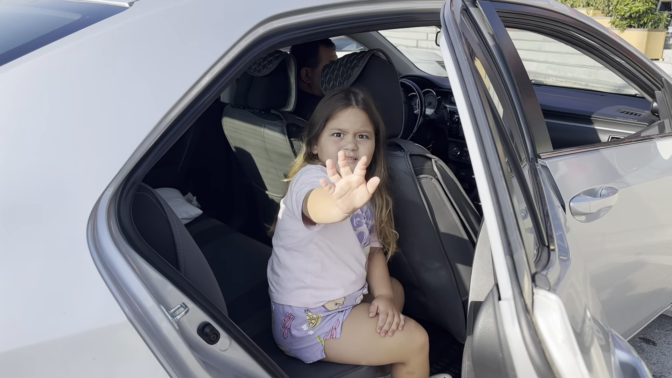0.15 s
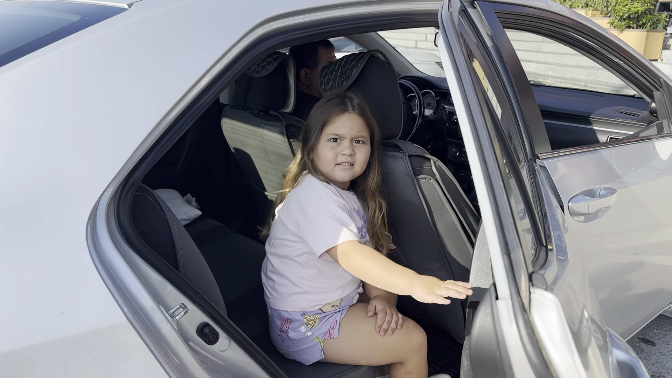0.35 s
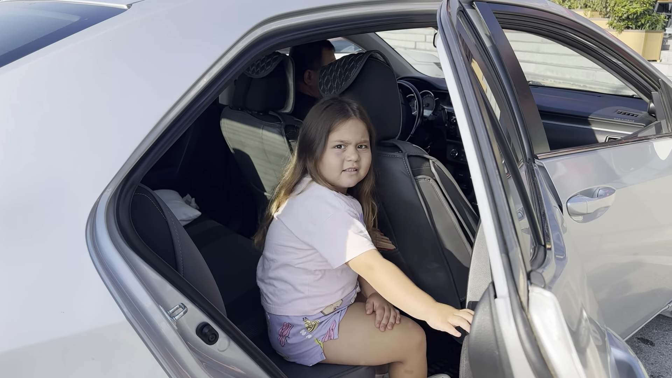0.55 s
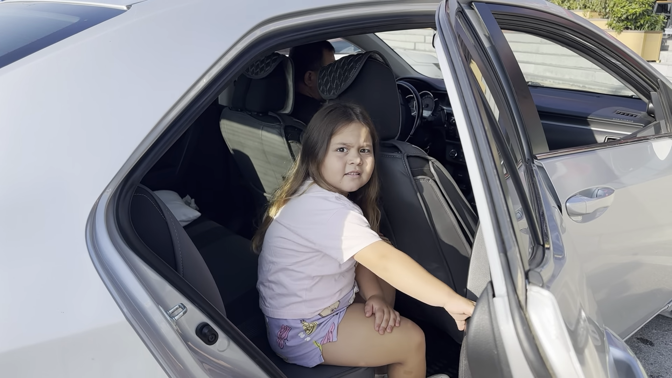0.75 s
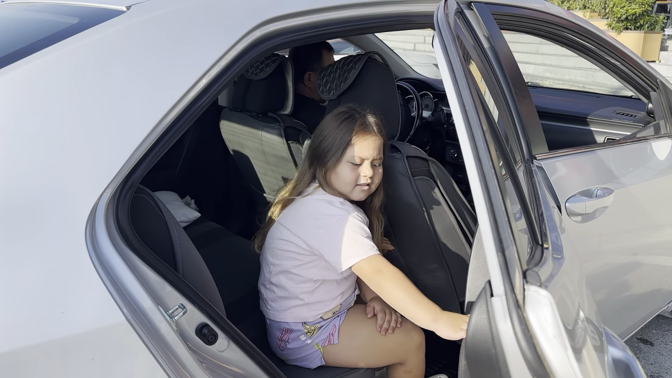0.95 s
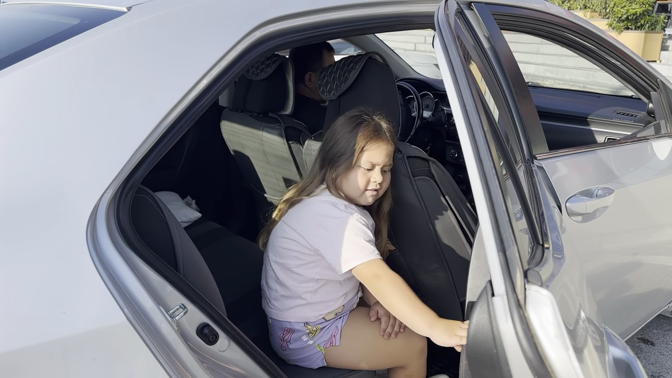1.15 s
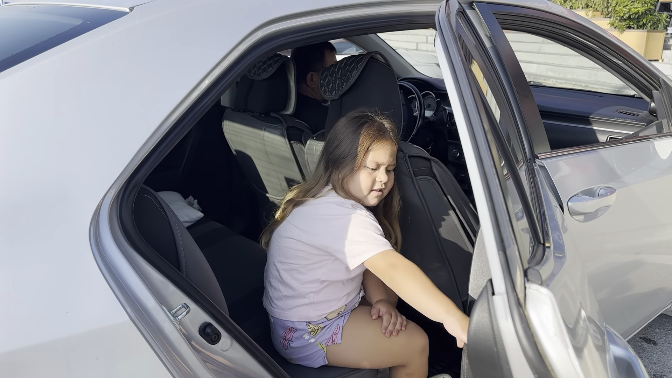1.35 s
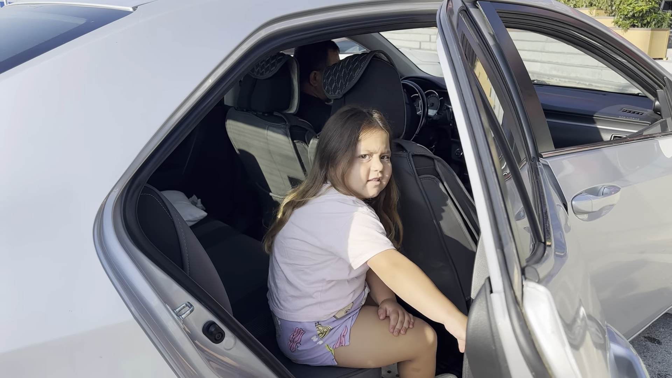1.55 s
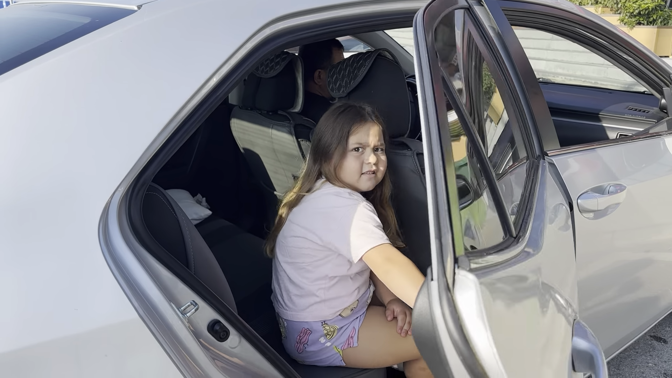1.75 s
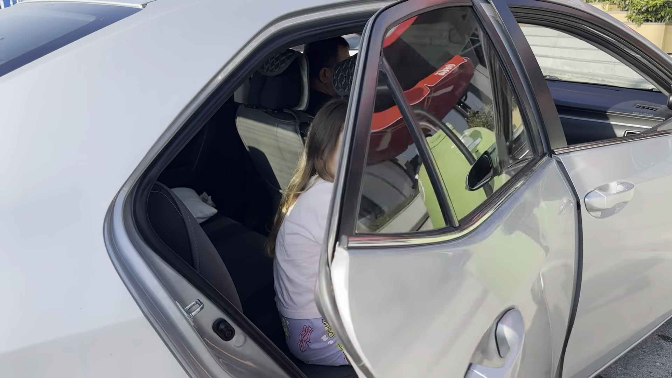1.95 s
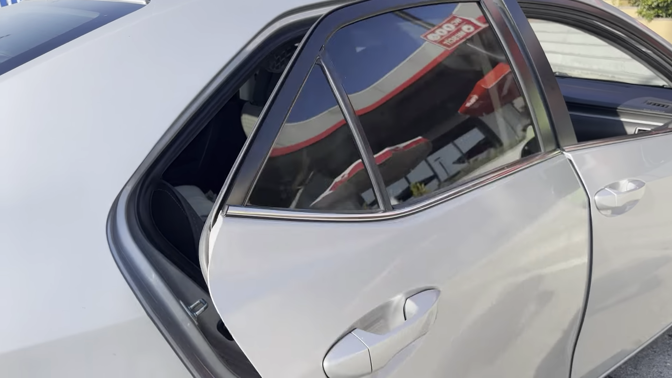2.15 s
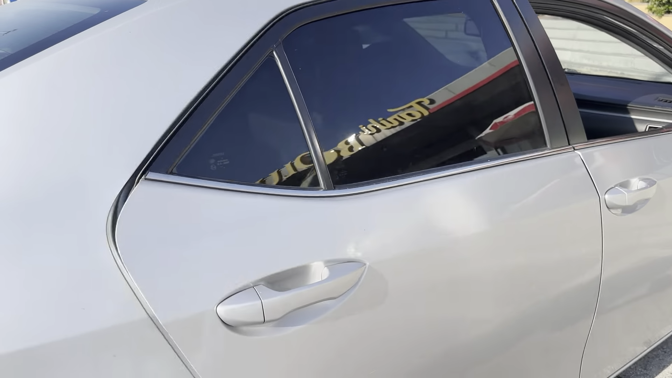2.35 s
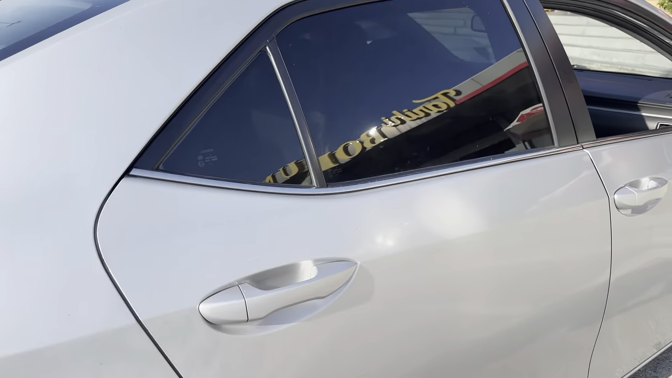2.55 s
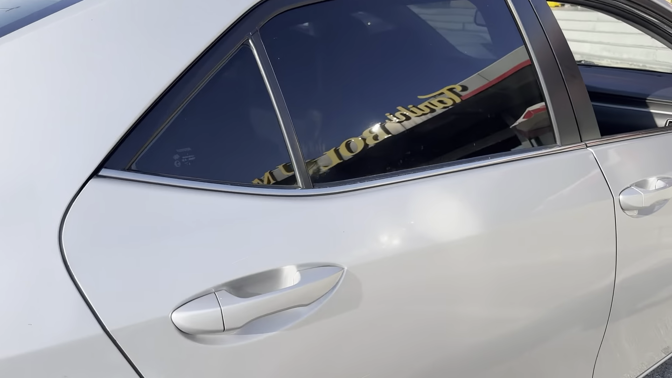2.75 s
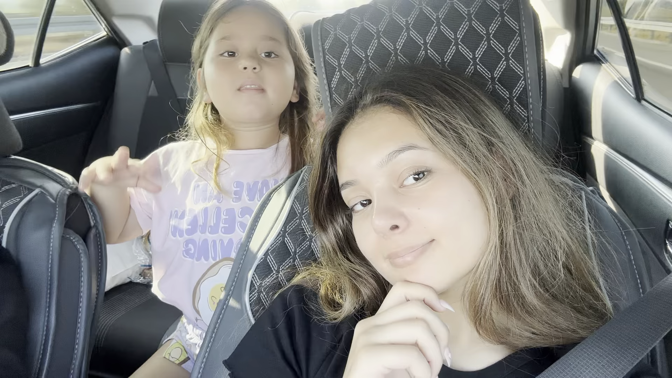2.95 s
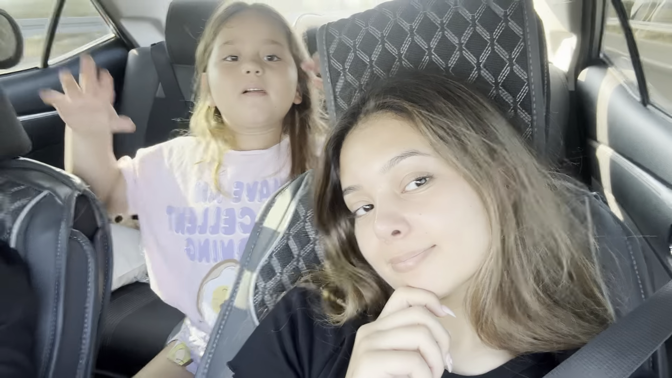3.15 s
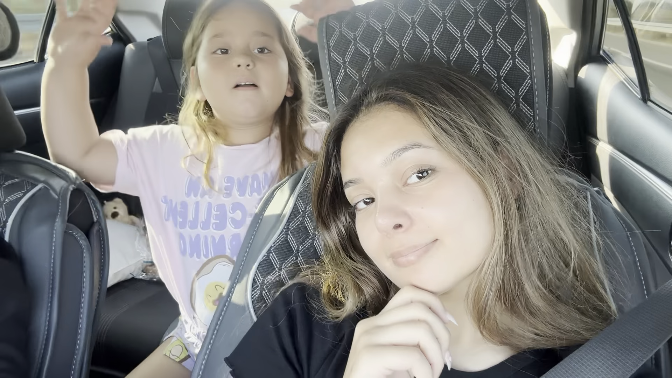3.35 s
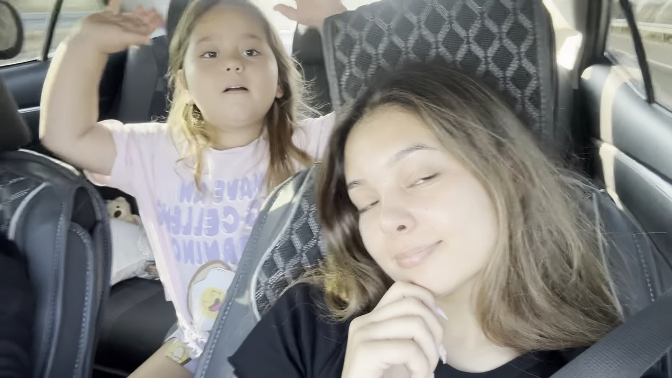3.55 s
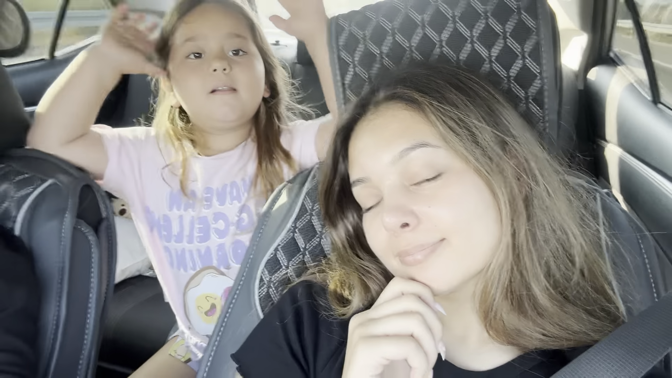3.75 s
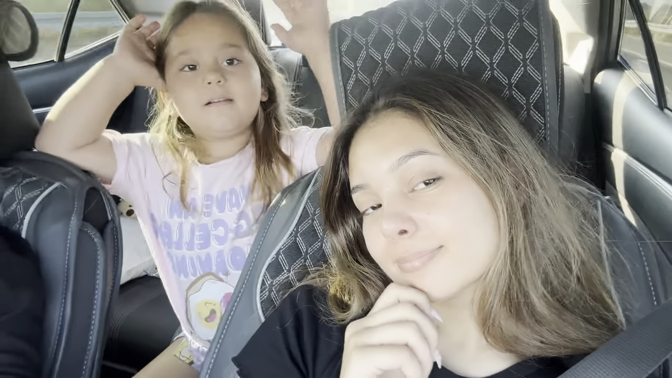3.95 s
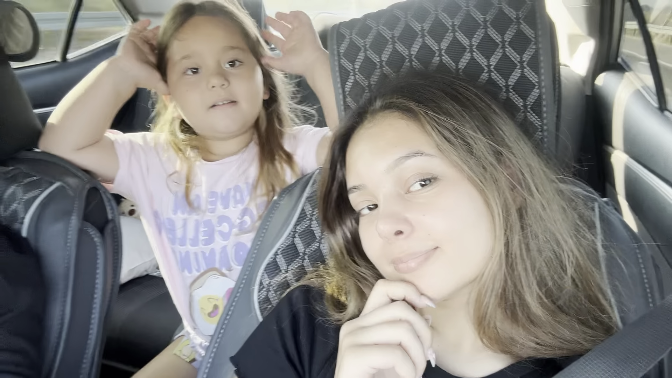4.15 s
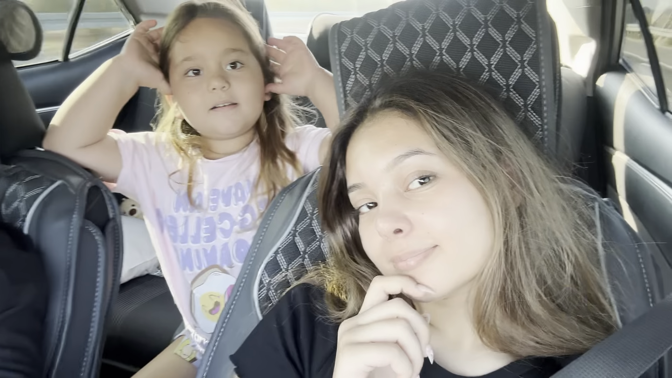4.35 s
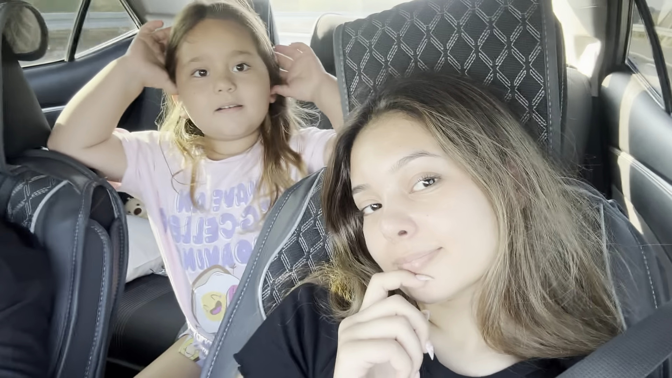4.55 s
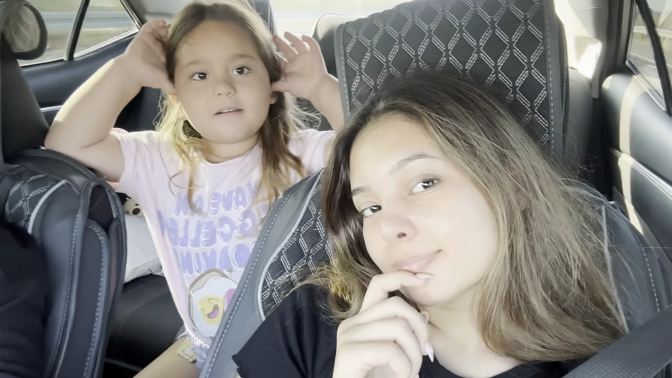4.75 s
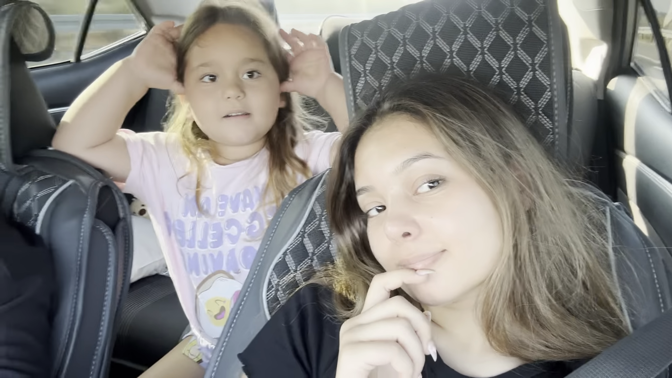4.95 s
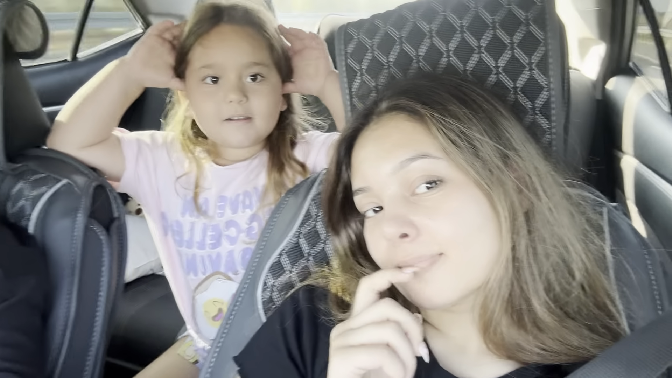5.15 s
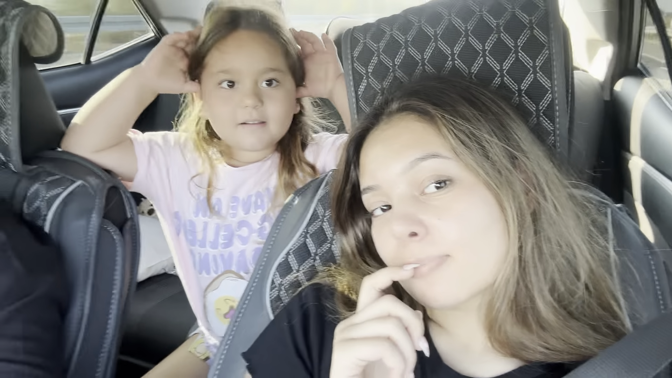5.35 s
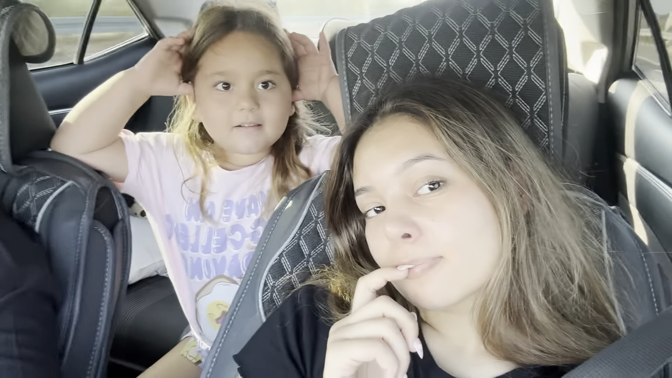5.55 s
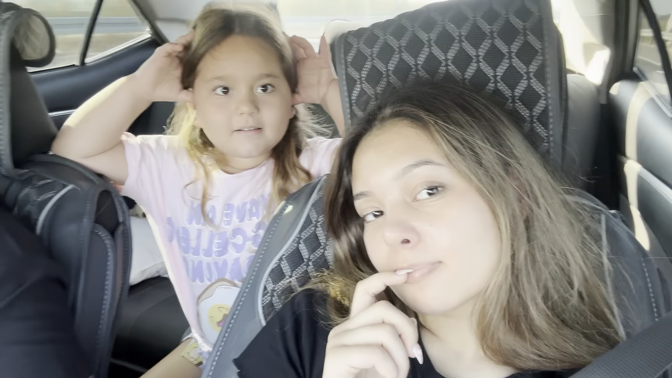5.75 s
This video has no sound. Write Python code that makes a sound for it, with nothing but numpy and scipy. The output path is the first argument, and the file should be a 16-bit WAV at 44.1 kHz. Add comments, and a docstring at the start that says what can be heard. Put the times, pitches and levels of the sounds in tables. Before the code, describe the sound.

The sound opens outdoors beside a parked car, with a faint low rumble of distant traffic and breeze. At about 1 second there is a tiny tick and a light brush, and at about 1.5 seconds a small metallic click as the rear door starts to swing. At about 2.4 seconds the door slams shut close by: one loud, solid thud with a sharp latch snap, a brief boom from the body and a short echo, gone within half a second.

At about 3 seconds the sound cuts abruptly to the inside of the car at cruising speed, starting with a dull bump. A steady low engine drone blends with the rumble and soft roar of tyres, clearly louder than the street was. Another soft road bump comes just after 4 seconds, and the driving noise carries on evenly until the end, near 6 seconds.

```python
"""Car door slam, then cruise.

In a quiet street a parked car's rear door rolls off its stay and is slammed: seal and latch strike,
the panels ring, the cabin booms, nearby walls echo. Then, abruptly, the inside of the car at a cruise:
engine and wheel orders drone, tyres rumble and roar on the road, faint wind hisses at the windows."""
import sys
import numpy as np
from scipy import signal
from scipy.fft import irfft
from scipy.io import wavfile
from scipy.ndimage import uniform_filter1d, minimum_filter1d

SR = 44100
rng = np.random.default_rng(int(sys.argv[2]) if len(sys.argv) > 2 else 0)


def to_wav(s):
    """Save 16-bit WAV."""
    ch = np.atleast_2d(s).T  # columns
    pcm = np.round(np.clip(ch, -1, 1) * 32767)  # PCM
    wavfile.write(sys.argv[1], SR, pcm.astype(np.int16))


N = 259647
TIME_S = np.arange(N) / SR
FREQ_HZ = np.maximum(np.arange(N // 2 + 1) * SR / N, 1)
CABIN_START_S = 3.036
CABIN_LAG_S = 0.00036   # left behind right

# street background spectrum: freq_hz, density_db
STREET_SPECTRUM = [(18, -50), (30, -23), (55, -2.5), (95, 0.5), (170, -6.5), (290, -14), (450, -18.5),
                   (620, -19.5), (880, -18.5), (1900, -28), (2900, -32.5), (4400, -33.5), (6000, -36),
                   (7800, -35), (9700, -36), (11300, -46.5), (12800, -59), (14600, -43), (15800, -39)]
# street left-right likeness: freq_hz, correlation
STREET_CORRELATION = [(60, 1), (200, 0.72), (400, 0.67), (900, -0.19), (2400, 0.3), (4400, 0.58),
                      (7600, 0.42), (8900, -2.31), (11500, 1), (15000, -0.47)]
# whirr of idling machinery: centre_hz, width_hz, boost_db
WHIRR_PEAKS = [(464, 49, 6.5), (890, 90, 3), (1290, 18, 9), (1533, 20, 10.5), (2370, 54, 5.5),
               (3600, 110, 1), (3880, 51, 5), (4260, 200, 7), (4670, 150, 7), (5450, 88, 7.5)]
# soft low knocks and puffs: start_s, level_db, pitch_hz, decay_cycles
STREET_BUMPS = [(.007, -17, 161.5, 12), (.022, -9.5, 165, 7.8), (0.026, -14, 72.6, 14),
                (0.106, -19.5, 79, 7.7), (.157, -11.5, 128, 3.3), (.42, -25, 100, 12),
                (0.731, -18, 93, 4.1), (1.235, -20, 109, 8.1)]
# forecourt echo decay: freq_hz, t60_s
ECHO_DECAY = [(100, 0.13), (400, 0.33), (1500, 0.32), (5000, 0.25), (14000, 0.21)]

# gust at the window seals: mid_s, level_db, half_length_s, centre_hz, width_oct
WINDOW_GUST = (4.6, -69, 0.45, 9500, .45)
# click as the cabin sets in: start_s, level_db, lowpass_hz
CABIN_TICK = (3.0565, -11.5, 2500)
# road joints through the suspension: start_s, level_db, pitch_hz, decay_cycles
ROAD_JOINTS = [(3.0365, -4, 104, 9.3), (3.082, -20, 111, 5), (4.136, -7.5, 100, 3.9)]
# body rumble spectrum: freq_hz, density_db
RUMBLE_SPECTRUM = [(18, -46), (27, -20), (36, -6.5), (64, -3), (98, -2), (115, -1), (146, -7), (185, -9),
                   (205, -18), (280, -30), (360, -50), (620, -120)]
# tyre roar spectrum: freq_hz, density_db
ROAR_SPECTRUM = [(130, -22.5), (220, -6.5), (306, -2), (420, -7.5), (500, -7), (620, -11), (900, -14.5),
                 (1220, -21.5), (1600, -24.5), (1900, -31), (3600, -39.5), (7200, -50), (10500, -61.5),
                 (15000, -71.5)]
# tyre and trim resonances: centre_hz, width_hz, boost_db
ROAR_PEAKS = [(560, 30, 0.5), (658, 18, 5.5), (770, 30, 3.5), (940, 110, 2.5), (1542, 53, 2.5),
              (1713, 25, 2), (2150, 250, 1), (2760, 120, 0), (3920, 250, 3.5), (10000, 490, 4.5)]
# cabin left-right likeness: freq_hz, correlation
CABIN_CORRELATION = [(60, 0.93), (130, 1), (290, .45), (640, 0.12), (1400, 0.4), (3000, 0.11), (7000, 0.04),
                     (15000, 0.16)]
# coarser and smoother road: mid_s, rumble_db, roar_db, half_length_s
ROAD_PATCHES = [(3.305, 0.5, 0.5, 0.15), (4.224, -1, -0.1, .15), (4.954, 2, 0.6, 0.24),
                (5.75, 1, 0.9, 0.21)]
# engine firing harmonics: order, level_db, left_minus_right_db
FIRING_ORDERS = [(1, -20, -0.5), (2, -28, -6), (3, -55.5, 3.5), (6, -52, 4)]
# tyre and drive train hum: pitch_hz, level_db
WHEEL_TONES = [(37.7, -32.5), (56.6, -26), (113.2, -27), (164, -36), (210, -42), (247, -39), (303, -41.5)]

# rubs and knocks of the pulled door: peak_s, level_db, centre_hz, width_oct, rise_s, t60_s
SWING_RUBS = [(1.033, -39.5, 2900, .4, 0.00088, 0.019), (1.033, -44, 11000, 0.56, .0006, 0.012),
              (1.205, -51, 6600, 0.17, 0.014, 0.29), (1.214, -49.5, 10500, 0.13, 0.02, 0.36),
              (1.245, -58, 15000, .1, .04, .25), (1.5463, -33.5, 4970, 0.6, .0006, 0.013),
              (1.557, -42, 6900, 0.73, 0.0033, 0.06), (1.56, -29, 560, 1.2, 0.0015, 0.05),
              (1.563, -42.5, 3850, 0.25, 0.005, 0.4), (1.574, -41, 3600, 1.9, 0.001, 0.14)]
# stay roller jumping its notch: start_s, level_db, tilt_db_per_oct
STAY_IMPACTS = [(1.5455, -11, 4), (1.5545, -8, 5), (1.5585, -7, 3), (1.5615, -2, -2), (1.5685, -8, -2),
                (1.575, -3, 2), (1.592, -12, 1)]
# stay and bracket modes: pitch_hz, level_db, t60_s
STAY_RING = [(484, -34, .08), (860, -41, .035), (1580, -49, .04), (2350, -47, 0.04), (3580, -39, 0.024),
             (3800, -43, 0.035), (4320, -42, 0.028), (5200, -48, .01), (6050, -48, .014), (6700, -47, .016)]
# door pushing on the body: peak_s, level_db, contact_s, highpass_hz
DOOR_PUSHES = [(2.4262, -5.5, 0.00021, 212), (2.434, 0.5, 0.011, 30), (2.4528, 1.5, 0.0027, 30.2)]
# door skin and cabin modes: pitch_hz, level_db, t60_s
PANEL_MODES = [(54.2, -18, 0.4), (73.5, -15.5, 0.28), (99, -20, 0.34), (145.2, -14, 0.3), (196, -9.5, 0.12),
               (231.8, -10, 0.32), (277, -29, 0.32), (319, -16, 0.34), (360, -0.5, 0.064),
               (396.3, -15, 0.34), (453, -13.5, 0.18), (620, -26, 0.17), (738, -25, .18), (894, -28, .25),
               (1400, -25, 0.13)]
# struck door spectrum: freq_hz, density_db
DOOR_SPECTRUM = [(60, 3), (200, 7.5), (380, 5.5), (550, -2), (750, -6.5), (1000, -4.5), (1180, -7.5),
                 (1450, -4), (1850, -9), (2400, -8), (3400, -14.5), (4500, -14.5), (7000, -11), (9400, -17),
                 (11700, -15), (15000, -20)]
# door shell resonances: centre_hz, width_hz, boost_db
SHELL_PEAKS = [(644, 58, 6.5), (980, 110, 5), (1410, 90, 2.5), (3200, 120, 1)]
# slam left-right likeness: freq_hz, correlation
SLAM_CORRELATION = [(100, 1), (1000, 1), (4000, 0.49), (9000, -0.87), (14000, 0.27)]
# seal, catch and striker contacts: peak_s, level_db, highpass_hz, lowpass_hz, t60_s, crack_relative_db
SLAM_CONTACTS = [(2.409, -20, 290, 750, 0.1, -23), (2.418, -13, 390, 200, 0.035, -32),
                 (2.4236, -14.5, 700, 1500, 0.045, -14), (2.4286, -8.5, 210, 700, 0.035, -5),
                 (2.434, -34, 5000, 12000, 0.03, -24), (2.446, -24, 5000, 15000, 0.028, -18),
                 (2.447, -11, 125, 200, 0.059, -12), (2.4535, -15.5, 190, 1100, 0.07, -10),
                 (2.467, -15, 110, 100, 0.3, -18), (2.493, -22.5, 200, 330, 0.15, -18)]
# catch rattling over the striker in two stages: start_s, level_db, tilt_db_per_oct
CATCH_IMPACTS = [(2.423, 0, -2), (2.426, -1, -1), (2.4289, -2, 1.5), (2.4465, -12, 5), (2.4535, -11, 1.5),
                 (2.459, -15, 2)]
# catch modes, dry snap and longer steel tones: pitch_hz, level_db, t60_s
CATCH_RING = [(990, -15, .032), (1400, -19, .02), (1680, -21, .012), (2450, -22, .011), (3900, -28, .008),
              (6000, -30, .005), (1836, -41, .09), (2370, -40, 0.065), (2690, -40, 0.09), (3030, -36, 0.08),
              (3670, -40, .07), (4222, -37, 0.066), (4970, -41, 0.08)]


def from_db(db):
    """Decibels to gain."""
    return 10 ** (np.asarray(db) / 20)


def unit_rms(x):
    """Scale to rms 1."""
    return x / np.sqrt(np.mean(x ** 2) + 1e-20)


def pan(left_minus_right_db):
    """Left and right gains."""
    return from_db([[left_minus_right_db / 2], [-left_minus_right_db / 2]])


def delay(x, lag_s):
    """Delay by a fractional number of samples."""
    return np.interp(TIME_S - lag_s, TIME_S, x, left=0)


def butterworth(x, order, edge_hz, kind):
    """Causal Butterworth filter."""
    return signal.sosfilt(signal.butter(order, edge_hz, kind, fs=SR, output="sos"), x)


def curve(points, at_hz=FREQ_HZ):
    """Interpolate over log frequency."""
    freq_hz, value = np.transpose(points)
    return np.interp(np.log(at_hz), np.log(freq_hz), value)


def resonances(peaks):
    """Spectral gain of resonant peaks."""
    return from_db(sum(db / (1 + (2 * (FREQ_HZ - hz) / width_hz) ** 2) for hz, width_hz, db in peaks))


def pink_band(centre_hz, width_oct):
    """Spectral gain of a bell-shaped band on a pink slope."""
    return np.exp(-0.5 * (np.log2(FREQ_HZ / centre_hz) / width_oct) ** 2) / np.sqrt(FREQ_HZ)


def drift(rate_hz, hop=200, warmup=1000):
    """Slow random wander, rms 1."""
    pole = np.exp(-2 * np.pi * rate_hz * hop / SR)
    white = rng.standard_normal(N // hop + warmup + 2)
    slow = signal.lfilter([1], [1, -2 * pole, pole * pole], white)[warmup:]
    return np.interp(np.arange(N) / hop, np.arange(len(slow)), unit_rms(slow))


def noise(colour, correlation, left_lag_s=0):
    """Coloured stereo noise, rms 1; correlation is clipped to +-0.99."""
    shape = (2, len(FREQ_HZ))
    mid, side = rng.standard_normal(shape) + 1j * rng.standard_normal(shape)
    correlation = np.clip(correlation, -0.99, 0.99)
    spectra = colour * (np.sqrt(1 + correlation) * mid + np.sqrt(1 - correlation) * side * [[1], [-1]])
    spectra[0] *= np.exp(-2j * np.pi * FREQ_HZ * left_lag_s)
    return unit_rms(irfft(spectra, N))


def swell(mid_s, half_length_s):
    """Gaussian envelope."""
    return np.exp(-((TIME_S - mid_s) / half_length_s) ** 2)


def burst(peak_s, rise_s, t60_s):
    """Gaussian rise, exponential decay."""
    age_s = TIME_S - peak_s
    return np.exp(-(np.minimum(age_s, 0) / rise_s) ** 2) * from_db(-60 * np.clip(age_s / t60_s, 0, 10))


def ring(force, pitch_hz, t60_s):
    """One damped mode driven by a force."""
    radius, step_rad = from_db(-60 / (t60_s * SR)), 2 * np.pi * pitch_hz / SR
    feedback = [1, -2 * radius * np.cos(step_rad), radius * radius]
    return signal.lfilter([0, np.sin(step_rad)], feedback, force + 1e-18)


def thumps(knocks, rise_s=0.0003):
    """Dull knocks: quickly damped sines."""
    out = 0
    for start_s, level_db, pitch_hz, decay_cycles in knocks:
        tone = np.sin(2 * np.pi * pitch_hz * np.maximum(TIME_S - start_s, 0))
        out += from_db(level_db) * burst(start_s, rise_s, decay_cycles / pitch_hz) * tone
    return out


def struck_steel(impacts, modes, spread_db=1.5, pivot_hz=2000):
    """Small steel parts: each impact rings every mode, a little differently per channel."""
    start_s, impact_db, tilt_db_per_oct = np.transpose(impacts)
    scatter_db = spread_db * rng.standard_normal((len(impacts), len(modes), 2))
    out = 0
    for k, (pitch_hz, mode_db, t60_s) in enumerate(modes):
        force_db = mode_db + impact_db + tilt_db_per_oct * np.log2(pitch_hz / pivot_hz)
        force = np.zeros((2, N))
        force[:, (start_s * SR).astype(int)] = from_db(force_db + scatter_db[:, k].T)
        out += (-1) ** k * ring(force, pitch_hz, t60_s)
    return out


def street(rumble_db=-38, hiss_db=-43, split_hz=300, gust_db=1.8, gust_rate_hz=12.5):
    """Lumpy rumble of traffic and breeze under an even, faintly whirring hiss."""
    colour = from_db(curve(STREET_SPECTRUM)) * resonances(WHIRR_PEAKS)
    correlation = curve(STREET_CORRELATION)
    low_share = 1 / (1 + (FREQ_HZ / split_hz) ** 8)
    rumble = noise(colour * np.sqrt(low_share), correlation)
    rumble *= from_db(rumble_db + gust_db * drift(gust_rate_hz))
    hiss = noise(colour * np.sqrt(1 - low_share), correlation) * from_db(hiss_db)
    return rumble + hiss


def bumps(right_lag_s=0.00082):
    """Soft low knocks, reaching the left first."""
    knocks = thumps(STREET_BUMPS)
    return np.array([knocks, delay(knocks, right_lag_s)])


def forecourt_echo(source, tail_samples=32768, build_s=0.012):
    """Diffuse echo off the ground and nearby walls, longest in the midrange."""
    age_s, tail = np.arange(tail_samples) / SR, 0
    for low_hz in 62.5 * 2 ** np.arange(8):
        octave = butterworth(rng.standard_normal((2, tail_samples)), 2, [low_hz, 2 * low_hz], "band")
        tail += octave * from_db(-60 * age_s / curve(ECHO_DECAY, low_hz * np.sqrt(2)))
    tail *= 1 - np.exp(-age_s / build_s)
    return signal.fftconvolve(source, unit_rms(tail) / np.sqrt(tail_samples), axes=1)[:, :N]


def window_hiss():
    """Thin hiss at the window seals, swelling and fading with a gust."""
    mid_s, level_db, half_length_s, centre_hz, width_oct = WINDOW_GUST
    hiss = noise(pink_band(centre_hz, width_oct), correlation=0.1)
    return from_db(level_db) * swell(mid_s, half_length_s) * hiss


def tick():
    """One faint, dulled click."""
    start_s, level_db, lowpass_hz = CABIN_TICK
    return from_db(level_db) * butterworth(signal.unit_impulse(N, int(start_s * SR)), 1, lowpass_hz, "low")


def jolts():
    """Wheels thump over road joints."""
    knocks = thumps(ROAD_JOINTS)
    return np.array([delay(knocks, CABIN_LAG_S), knocks])


def road(rumble_db=-17, roar_db=-26, growth_db_per_s=0.16, rumble_waver_db=0.36, roar_waver_db=0.7,
         treble_right_db=3.5, lean_above_hz=1100):
    """Tyres shake the body and roar on asphalt, more with speed and on coarse stretches."""
    speed_db = growth_db_per_s * (TIME_S - CABIN_START_S)
    shake_db, coarse_db = sum(np.outer(levels_db, swell(mid_s, half_length_s))
                              for mid_s, *levels_db, half_length_s in ROAD_PATCHES)
    correlation = curve(CABIN_CORRELATION)
    rumble = noise(from_db(curve(RUMBLE_SPECTRUM)), correlation, CABIN_LAG_S)
    rumble *= from_db(rumble_db + speed_db + shake_db + rumble_waver_db * drift(rate_hz=13))
    colour = from_db(curve(ROAR_SPECTRUM)) * resonances(ROAR_PEAKS)
    lean_db = treble_right_db / (1 + (lean_above_hz / FREQ_HZ) ** 4)
    roar = noise(colour * from_db([-lean_db / 2, lean_db / 2]), correlation, CABIN_LAG_S)
    roar *= from_db(roar_db + speed_db + coarse_db + roar_waver_db * drift(rate_hz=25))
    return rumble + roar


def drone(firing_hz=93, creep_hz_per_s=0.5, engine_waver_db=0.5, wheel_waver_db=2.4, wheel_slip=0.00402):
    """Orders of engine firing and turning wheels, wavering with the load."""
    firings = np.cumsum(firing_hz + creep_hz_per_s * (TIME_S - CABIN_START_S)) / SR
    tones = 0
    for order, level_db, pan_db in FIRING_ORDERS:
        gain = pan(pan_db) * from_db(level_db + engine_waver_db * drift(rate_hz=6.1))
        tones += gain * np.sin(2 * np.pi * (order * firings + rng.random()))
    rolled_s = np.cumsum(1 + wheel_slip * drift(rate_hz=2.03)) / SR
    for pitch_hz, level_db in WHEEL_TONES:
        gain = from_db(level_db + wheel_waver_db * drift(rate_hz=5.4))
        tones += gain * np.sin(2 * np.pi * (pitch_hz * rolled_s + rng.random()))
    left, right = np.sqrt(2) * tones
    return np.array([delay(left, CABIN_LAG_S), right])


def door_swing():
    """A tick, a brush on the trim, then the door rolls off its stay."""
    rubs = 0
    for peak_s, level_db, centre_hz, width_oct, rise_s, t60_s in SWING_RUBS:
        friction = noise(pink_band(centre_hz, width_oct), correlation=0.18)
        rubs += from_db(level_db) * burst(peak_s, rise_s, t60_s) * friction
    return rubs + struck_steel(STAY_IMPACTS, STAY_RING)


def door_panels(gain_db=1.5, spread_db=1.0, bending_hz=500):
    """The hard striker rings the high modes; long, soft seal pushes reach only the lowest."""
    force, out = 0, 0
    for peak_s, level_db, contact_s, highpass_hz in DOOR_PUSHES:
        pulse = swell(peak_s, contact_s / 2)
        force += butterworth(from_db(level_db) * pulse / pulse.sum(), 2, highpass_hz, "high")
    for k, (pitch_hz, level_db, t60_s) in enumerate(PANEL_MODES):
        # the skin moves as a whole in the bass, in opposed patches above
        sign = (-1) ** k if pitch_hz > bending_hz else 1
        gain = from_db(level_db + gain_db + spread_db * rng.standard_normal((2, 1)))
        out += sign * gain * ring(force, pitch_hz, t60_s)
    return out


def door_latch(hard_rise_s=0.00067, crack_t60_s=0.0096, crack_above_hz=2000):
    """Seal, catch and striker meet in turn; each cracks and shakes a cloud of short-lived modes."""
    shell = from_db(curve(DOOR_SPECTRUM)) * resonances(SHELL_PEAKS)
    out = 0
    for peak_s, level_db, highpass_hz, lowpass_hz, t60_s, crack_relative_db in SLAM_CONTACTS:
        rise_s = hard_rise_s + 1 / lowpass_hz   # dull contacts close more slowly
        colour = shell / np.hypot(1, FREQ_HZ / lowpass_hz) / np.hypot(1, (highpass_hz / FREQ_HZ) ** 3)
        cloud = from_db(level_db) * noise(colour, curve(SLAM_CORRELATION))
        crack = from_db(crack_relative_db) * butterworth(cloud, 1, crack_above_hz, "high")
        out += cloud * burst(peak_s, rise_s, t60_s) + crack * burst(peak_s, rise_s / 2, crack_t60_s)
    return out + struck_steel(CATCH_IMPACTS, CATCH_RING)


def scene(echo_db=-19.5, street_pan_db=-2.1, door_pan_db=-1.2, cabin_pan_db=1.1, crossfade_s=0.0027):
    """The slam at the kerb, then the moving cabin."""
    door = (door_swing() + door_latch() + door_panels()) * pan(door_pan_db)
    kerb = (street() + bumps()) * pan(street_pan_db) + door + from_db(echo_db) * forecourt_echo(door)
    cabin = (road() + jolts() + window_hiss() + drone() + tick()) * pan(cabin_pan_db)
    inside = np.clip((TIME_S - CABIN_START_S) / crossfade_s, 0, 1)
    return (1 - inside) * kerb + inside * cabin


def record(dry, ceiling=1.0, highpass_hz=18, lowpass_hz=15900, window_samples=221):
    """High-pass, look-ahead peak limiter, steep low-pass."""
    trimmed = butterworth(dry, 2, highpass_hz, "high")
    allowed_gain = ceiling / np.maximum(np.abs(trimmed).max(axis=0), ceiling)
    gain = uniform_filter1d(minimum_filter1d(allowed_gain, window_samples), window_samples)
    return signal.sosfilt(signal.ellip(10, 0.1, 90, lowpass_hz, fs=SR, output="sos"), trimmed * gain)


dry = scene()
out = record(dry)
to_wav(out)
```